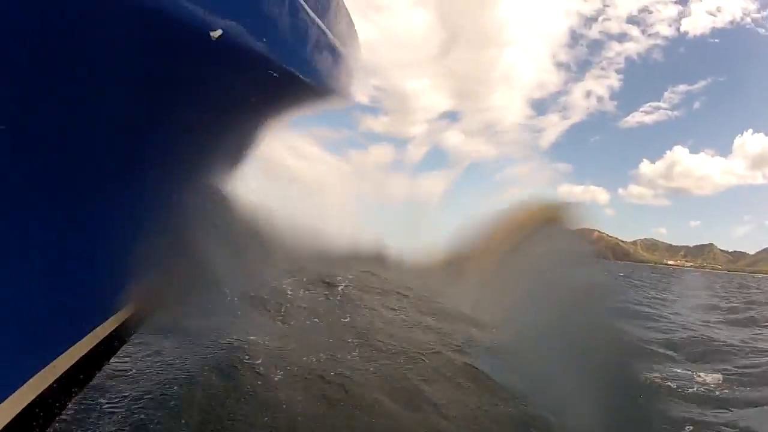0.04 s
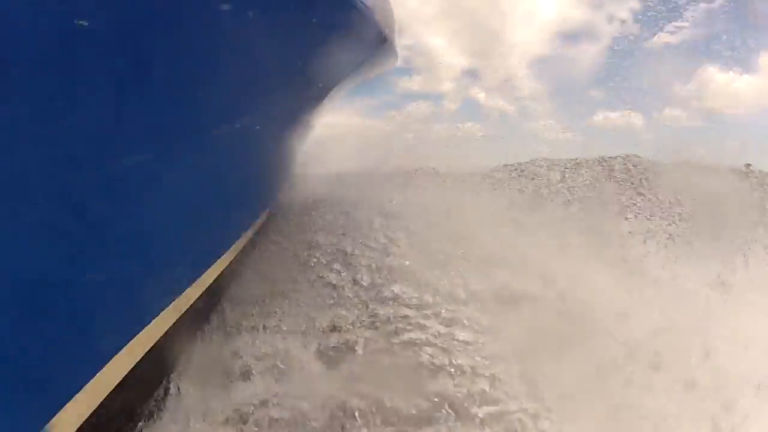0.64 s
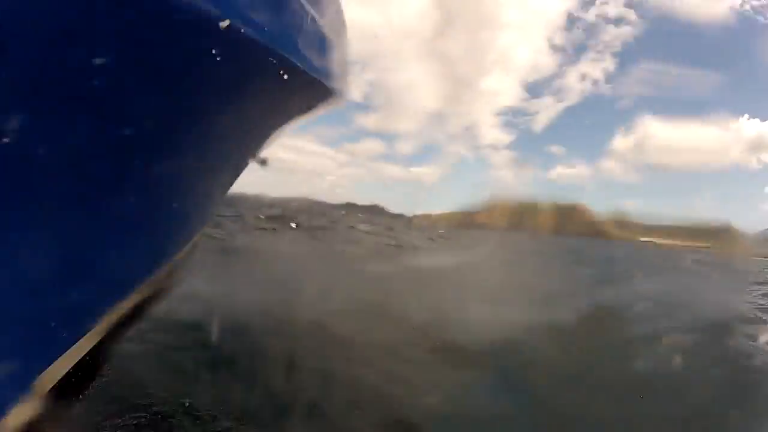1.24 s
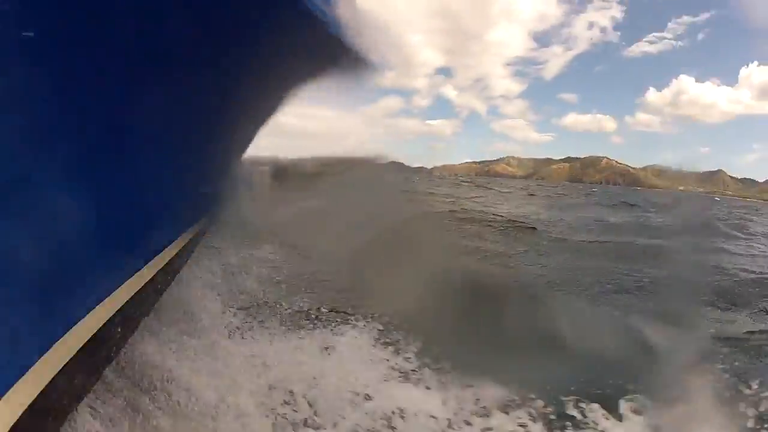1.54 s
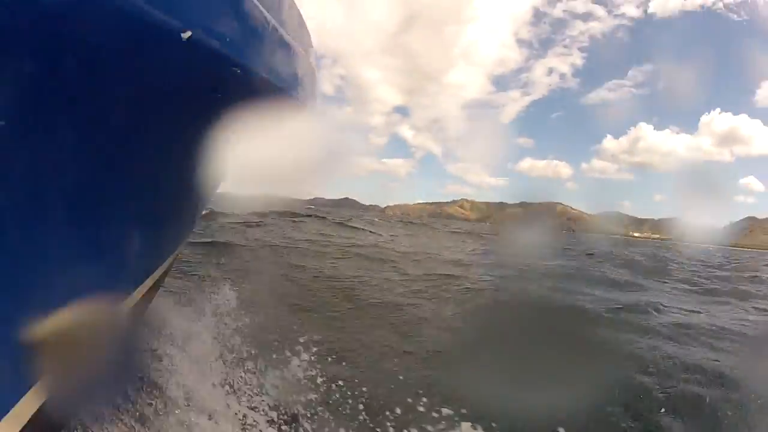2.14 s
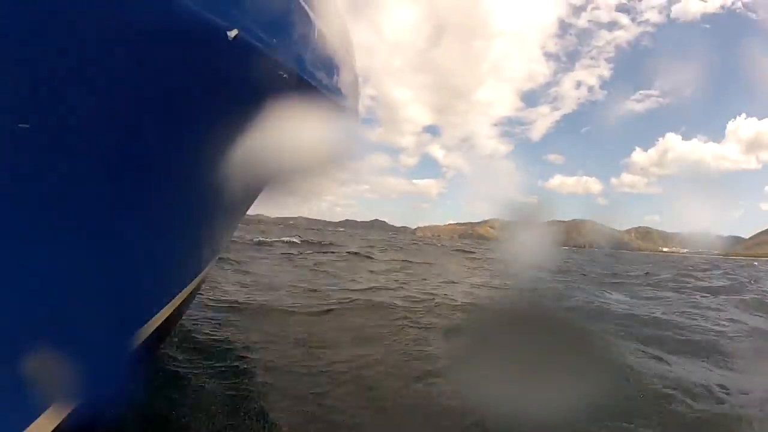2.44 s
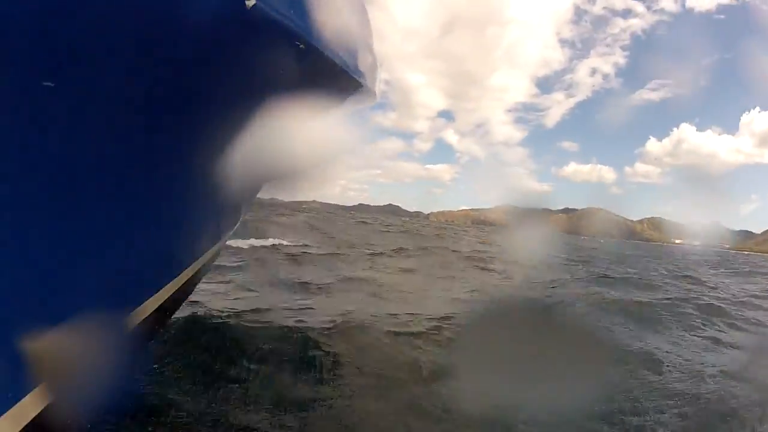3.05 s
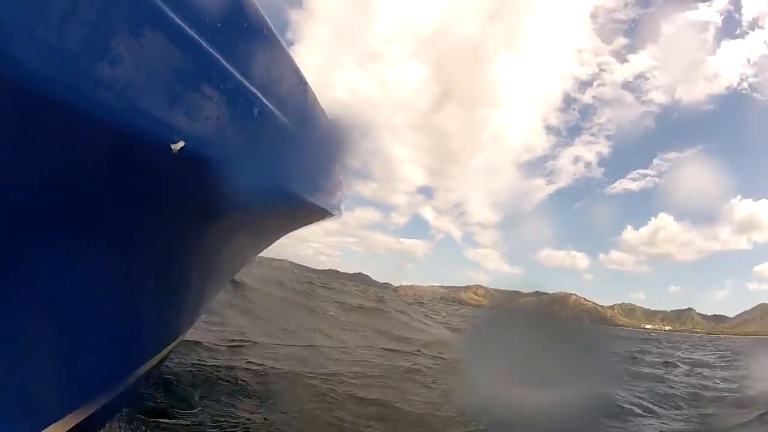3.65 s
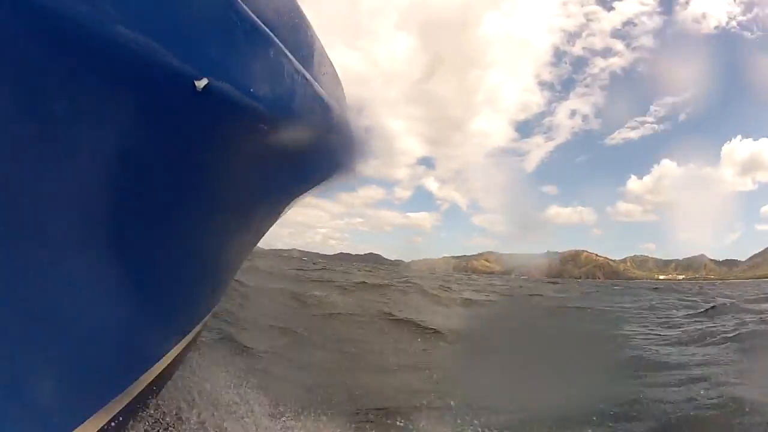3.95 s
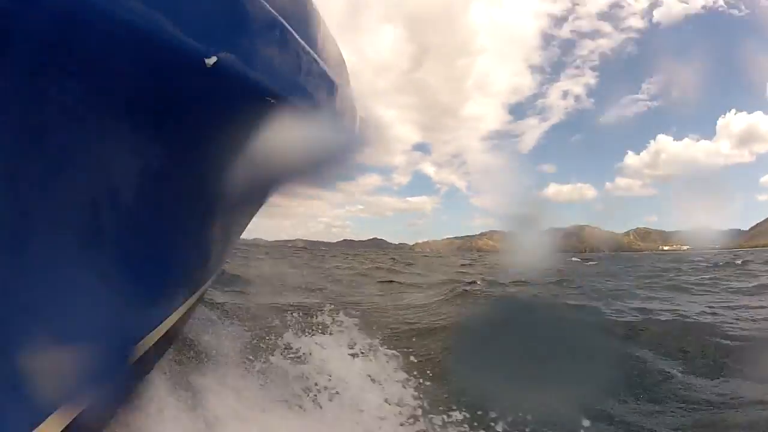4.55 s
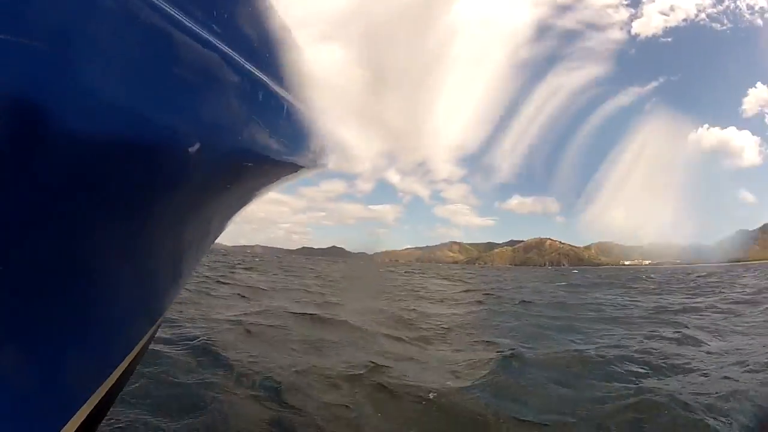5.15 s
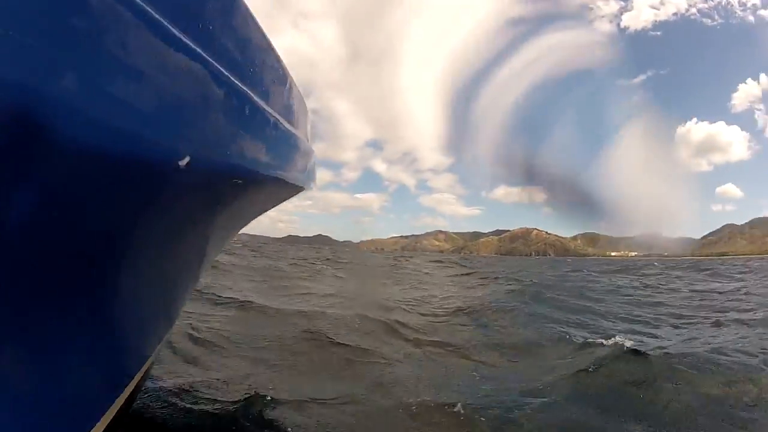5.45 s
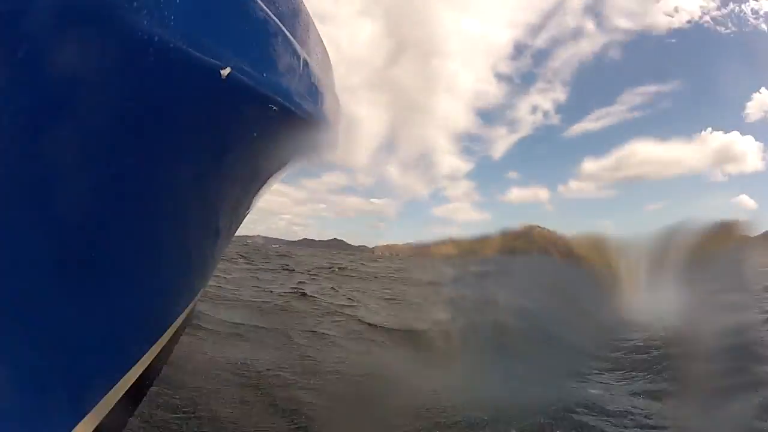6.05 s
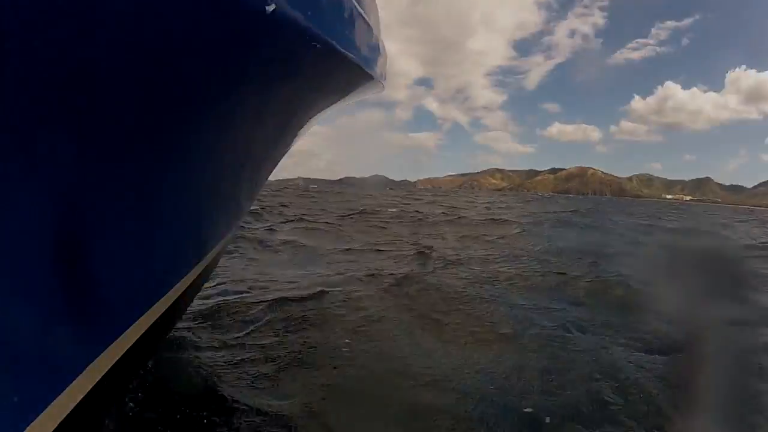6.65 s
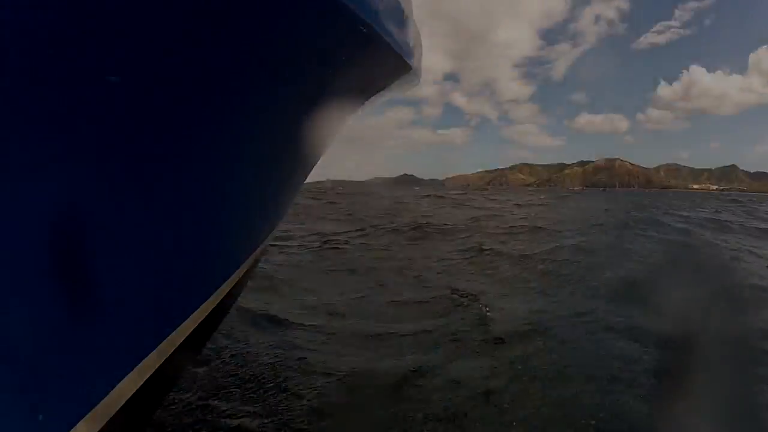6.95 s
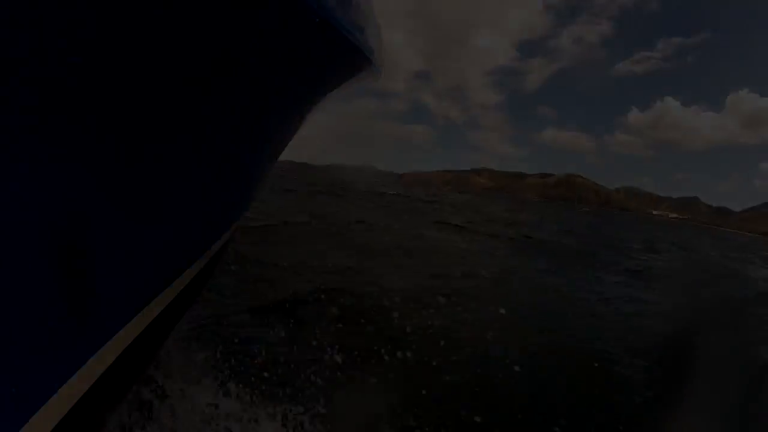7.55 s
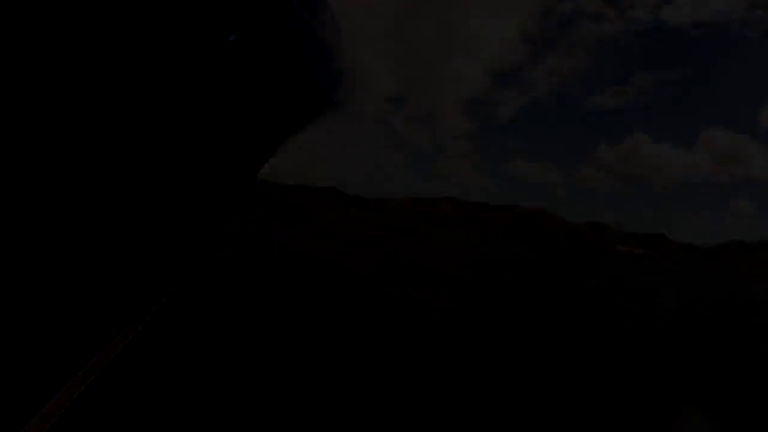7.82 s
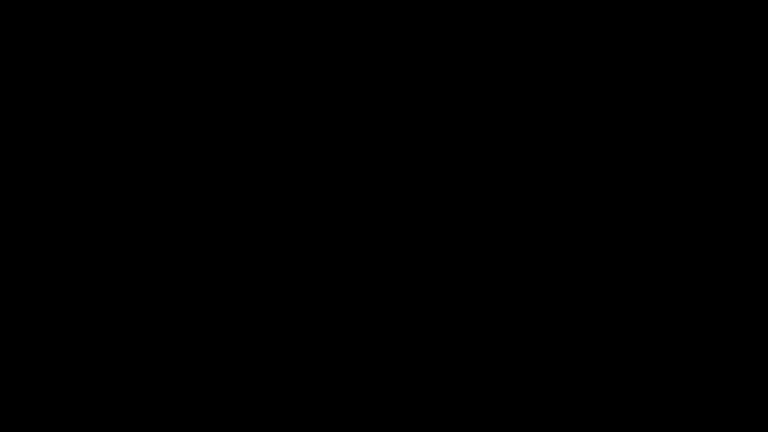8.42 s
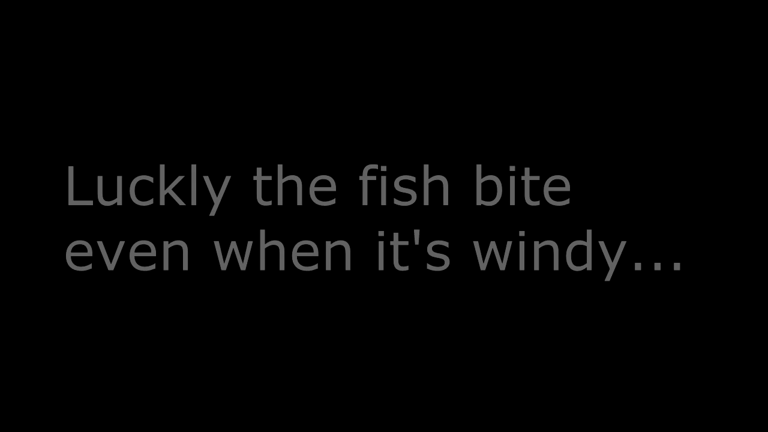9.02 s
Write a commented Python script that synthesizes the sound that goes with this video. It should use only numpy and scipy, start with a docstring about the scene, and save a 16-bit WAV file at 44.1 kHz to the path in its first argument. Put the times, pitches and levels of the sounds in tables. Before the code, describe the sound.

A boat cuts through choppy sea with surging water hiss, buffeting wind, hull thuds and spray rattling on the microphone.

```python
"""Hiss swelling with each wave, wind rumble and splashes: a motorboat in a choppy sea, heard by a camera
in a waterproof case held low beside the bow. The bow thuds into waves; air whistles past it once.
Three times water comes over: spray rattles on the case and lumps knock on it. Sheets of water
muffle sea and wind until they drain. The sound fades out at the end."""
import sys
import numpy as np
from scipy import signal
from scipy.fft import rfft, irfft
from scipy.io import wavfile
from scipy.ndimage import uniform_filter1d

SR = 44100
rng = np.random.default_rng(int(sys.argv[2]) if len(sys.argv) > 2 else 0)


def unload_wav(signal):
    """Save mono or channel-first audio to the path in sys.argv[1] as 16-bit WAV at rate SR, clipped to [-1, 1]."""
    wavfile.write(
        sys.argv[1],
        SR,
        np.round(np.clip(np.atleast_2d(signal).T, -1, 1) * 32767).astype(np.int16),
    )


N = 409241
TIME = np.arange(N) / SR
HOLD_HZ = 12000  # camera's sample-and-hold rate

# spectrum of water's dull push on the case: (frequency [Hz], relative gain [dB])
PUSH_SPECTRUM = [(30, -11), (170, -3), (350, -3), (550, -2.5), (780, -5), (1080, -5.5), (1400, -13),
                 (1700, -5.5), (2500, -23.5), (6000, -51.5)]


def undb(db):
    """Decibels to gain."""
    return 10 ** (np.asarray(db) / 20)


def unit(x):
    """Scale to rms 1."""
    return x / np.sqrt(np.mean(x ** 2))


def power_sum_db(a_db, b_db):
    """Level of two unrelated sounds together."""
    return 10 * np.log10(undb(a_db) ** 2 + undb(b_db) ** 2)


def curves(table):
    """Table columns, interpolated linearly in time."""
    times_s, *columns = np.transpose(table)
    return [np.interp(TIME, times_s, column) for column in columns]


def envelope(start_s, length_s, attack_s, release_s):
    """Linear attack, hold until length_s, exponential release."""
    age_s = TIME - start_s
    return np.clip(age_s / attack_s, 0, 1) * np.exp(-np.clip((age_s - length_s) / release_s, 0, 20))


def flutter(rate_hz):
    """Random steps, smoothed twice; rms 1."""
    hold = max(int(SR / rate_hz), 1)
    steps = np.repeat(rng.standard_normal(N // hold + 1), hold)
    return unit(uniform_filter1d(uniform_filter1d(steps, hold), hold)[:N])


def colour(x, spectrum, size=8192):
    """Causal unit-energy filter with the given spectrum, cut above HOLD_HZ / 2."""
    hz, db = np.transpose(spectrum)
    bins_hz = np.arange(size // 2 + 1) * SR / size
    gain = undb(np.interp(np.log(bins_hz + 1), np.log(hz), db))
    cepstrum = irfft(np.log(gain))
    cepstrum[1:size // 2] *= 2  # fold to minimum phase
    cepstrum[size // 2 + 1:] = 0
    lowpass = signal.butter(10, HOLD_HZ / 2, fs=SR, output="sos")
    response = signal.sosfilt(lowpass, irfft(np.exp(rfft(cepstrum))))
    return signal.fftconvolve(x, response / np.linalg.norm(response))[:N]


def drops(rate_hz, spread_db, max_spreads=3.35):
    """Random impacts, many small, a few large; rms 1."""
    lands = rng.random(N) < rate_hz / SR
    sizes = undb(spread_db * np.minimum(rng.exponential(size=N), max_spreads))
    return unit(lands * sizes * rng.choice([-1, 1], N))


def wind(wave_rumble_db, loss_db, puff_db=2.1):
    """Eddies buffet the case in quick, uneven puffs; waves add to the rumble."""
    # wind strength on the case: (time [s], level [dB])
    strength = [(0, -29.5), (.24, -23), (.45, -23.5), (.7, -28), (1.2, -30), (1.57, -25), (1.87, -30.5),
                (2.1, -28.5), (2.55, -31), (2.85, -30.5), (3.2, -34), (3.6, -29), (4.6, -29), (5.3, -31),
                (6.3, -31.5), (6.7, -34), (7.6, -33.5), (8.35, -30.5)]
    # rumble inside the case: (frequency [Hz], relative gain [dB])
    spectrum = [(12, -5.5), (25, -3), (45, -5.5), (75, -3), (140, 0.5), (210, -2), (300, -3.5), (400, -8.5),
                (620, -18.5), (1200, -22.5), (4000, -71)]
    level_db = power_sum_db(curves(strength)[0], wave_rumble_db) - loss_db
    rumble = colour(rng.standard_normal(N), spectrum)
    return unit(rumble * undb(puff_db * flutter(35))) * undb(level_db)


def whistle(pitch_wobble=0.0183, flicker_db=2.0):
    """Air past the bow: a thin tone that firms up, then rises as it dies."""
    # course of the whistle: (time [s], pitch [Hz], level [dB])
    course = [(3.24, 2150, -64), (3.31, 2120, -59), (3.4, 2173, -32), (3.455, 2090, -49),
              (3.485, 2064, -30), (3.52, 2080, -29), (3.55, 2130, -30), (3.585, 2190, -65)]
    hz, db = curves(course)
    sounding = (TIME > course[0][0]) & (TIME < course[-1][0])
    unsteady = np.clip((db.max() - db) / 8, .3, 1)  # weaker flow, shakier tone
    phase = 2 * np.pi * np.cumsum(hz * (1 + pitch_wobble * unsteady * flutter(220))) / SR
    return sounding * undb(db + flicker_db * unsteady * flutter(70)) * np.sqrt(2) * np.sin(phase)


def swell(wash_db=-33, fall_per_rise=1.13):
    """Bow wave level in dB: steady wash, a surge per wave, a sudden rush per slam."""
    # waves the bow cuts: (crest time [s], hiss level [dB], rise [s])
    waves = [(.24, -30.5, 0.057), (0.541, -25, 0.085), (1.25, -28, 0.059), (1.59, -22, 0.12),
             (2.05, -29, 0.13), (2.25, -27.5, 0.072), (2.35, -28.5, 0.039), (2.58, -27, 0.094),
             (2.75, -28, 0.049), (2.87, -28, 0.045), (2.98, -27, 0.055), (3.23, -31, 0.082),
             (3.41, -31.5, .045), (3.69, -29.5, 0.06), (3.92, -22.5, 0.082), (4.16, -28, 0.088),
             (4.45, -33.5, 0.066), (4.69, -25.5, .13), (4.96, -27.5, 0.054), (5.4, -39.5, 0.058),
             (5.99, -27, 0.086), (6.16, -31, 0.066), (6.59, -34, .11), (6.825, -23, 0.045),
             (7.06, -24.5, 0.066), (7.35, -31, 0.071), (7.55, -25, 0.09), (8.07, -34.5, 0.073),
             (8.32, -35, .08)]
    # water thrown as the bow slams: (start [s], length [s], hiss level [dB])
    slams = [(0.345, 0.095, -20), (5.529, 0.15, -20.5)]
    power = undb(wash_db) ** 2
    for crest_s, db, rise_s in waves:
        width_s = np.where(TIME < crest_s, rise_s, rise_s * fall_per_rise)
        power += undb(db) ** 2 * np.exp(-np.minimum(((TIME - crest_s) / width_s) ** 2, 100))
    for start_s, length_s, db in slams:
        power += (undb(db) * envelope(start_s, length_s, attack_s=.008, release_s=.044)) ** 2
    return 10 * np.log10(power)


def water_sheets(close_s=0.0071, drain_s=0.052):
    """Loss in dB under sheets of water, which close fast and drain slowly."""
    # sheets covering the case: (time closed [s], hold [s], depth [dB])
    sheets = [(1.09, 0.058, 12), (1.32, 0.013, 4), (4.798, 0.028, 21), (5.7, .1, 13)]
    return sum(depth_db * envelope(closed_s - close_s, close_s + hold_s, close_s, drain_s)
               for closed_s, hold_s, depth_db in sheets)


def bow_wave(level_db, band_flicker_db=0.5, flicker_db=0.96):
    """Foam and droplets fall back on the sea; the harder thrown, the brighter the hiss."""
    # hiss inside the case, which rings near 2 kHz: (frequency [Hz], relative gain [dB])
    spectrum = [(150, -29), (450, -13), (700, -17), (1020, -11), (1340, -20), (1780, -4), (2130, 1),
                (2680, -5), (2900, -10), (3220, -14), (3560, -8), (3930, -15.5), (4480, -11), (5100, -21),
                (6000, -22.5)]
    fizz = colour(rng.standard_normal(N) + undb(-3) * drops(rate_hz=2500, spread_db=6.0), spectrum)
    treble = signal.sosfiltfilt(signal.butter(3, 2400, "high", fs=SR, output="sos"), fizz)
    brightness_db = 0.1 * np.clip(level_db - np.median(level_db), -8, 8)
    hiss = (fizz - treble) * undb(band_flicker_db * flutter(25))
    hiss += treble * undb(brightness_db + band_flicker_db * flutter(16))
    return unit(hiss * undb(flicker_db * flutter(35))) * undb(level_db)


def hull_thuds(size=8192):
    """A wave shoves hull and case, which swing for a cycle or two."""
    # bow meeting a wave: (time [s], envelope peak [dB], pitch [Hz], decay [s])
    shoves = [(.354, -8.5, 208, 0.0035), (.405, -1, 169, 0.0039), (.459, -12, 36, .015),
              (.508, -16, 55, .012), (0.559, -9, 110, 0.0034), (1.565, -12, 137, .012),
              (4.75, -11.5, 155, 0.0081), (5.539, -12.5, 140, 0.01), (5.565, -18, 120, .015),
              (5.602, -7, 172, 0.0045), (5.733, -12, 230, .004), (5.74, -7, 120, 0.005),
              (5.85, -21.5, 169, 0.0069), (6.784, -17.5, 285, 0.0064), (8.04, -15, 190, 0.0046),
              (8.06, -19, 50, .016)]
    out, age_s = np.zeros(N), np.arange(size) / SR
    for start_s, db, hz, decay_s in shoves:
        i = int(start_s * SR)
        rise = 2 * age_s / decay_s
        out[i:i + size] += undb(db) * rise * np.exp(1 - rise) * np.sin(2 * np.pi * hz * age_s)
    return out


def case_ring(blows):
    """The walls store each blow at their resonances and release it over a few milliseconds."""
    # wall resonances: (frequency [Hz], bandwidth [Hz])
    modes = [(2050, 600), (2450, 430), (3650, 320)]
    # a drop's impact inside the case: (frequency [Hz], relative gain [dB])
    spectrum = [(80, -13.5), (400, -16), (720, -9), (1050, -6), (1330, -10.5), (1750, 0.5), (2100, 3),
                (2550, -1), (2900, -6.5), (3300, -6.5), (3650, -3), (4200, -8.5), (5050, -12), (5900, -14)]
    for hz, width_hz in modes:
        poles = signal.iirpeak(hz, hz / width_hz, fs=SR)[1]
        blows = signal.lfilter(poles[::-1], poles, blows)  # all-pass: smears in time only
    return colour(blows, spectrum)


def spray(stray_db, flicker_db=1.4):
    """Showers and stray drops ring the case; heavy drops also give a dull push."""
    # showers on the case: (start [s], length [s], level [dB], push re level [dB]); mist pushes least
    showers = [(.345, 0.21, -30, -8), (.59, 0.18, -18.5, -10), (.77, .2, -19, -20), (.97, 0.079, -18.5, -3),
               (1.045, 0.048, -30.5, -8), (1.1, 0.17, -29.5, -9), (1.22, .075, -21, -9),
               (1.3, 0.034, -29.5, -3), (1.62, .19, -23.5, -7), (4.715, 0.067, -24.5, 0),
               (5.665, .035, -23, -2), (5.71, 0.072, -35.5, 5), (5.85, .16, -28, -9)]
    ring_power, push_power = undb(stray_db) ** 2, 0
    for start_s, length_s, db, weight_db in showers:
        power = (undb(db) * envelope(start_s, length_s, attack_s=.012, release_s=.008)) ** 2
        ring_power += power
        push_power += power * undb(weight_db) ** 2
    impacts = unit(drops(rate_hz=1250, spread_db=4.0) * undb(flicker_db * flutter(150)))
    return case_ring(impacts * np.sqrt(ring_power)) + colour(impacts * np.sqrt(push_power), PUSH_SPECTRUM)


def slaps(splatter_s=0.00076, splatter_in_push=0.071, ring_gain_db=23, push_gain_db=18.5, size=768):
    """A lump of water pushes the case once and breaks up in milliseconds of splatter."""
    # lumps hitting the case: (time [s], relative ring level [dB], relative push level [dB])
    lumps = [(0.351, -17, -28.5), (0.617, -17, -19), (.637, -18, -21), (.664, -17, -28), (.685, -18, -22),
             (.709, -14.5, -20), (.755, -16, -26), (.803, -17, -36), (.841, -13, -30.5),
             (0.852, -13.5, -27), (.888, -12.5, -18), (0.929, -10, -26.5), (.984, -14, -29),
             (1.017, -17, -14), (1.022, -16.5, -4), (1.031, -14.5, -12), (1.038, -18, -11.5),
             (1.068, -22.5, -7.5), (1.08, -20, -5), (1.101, -16, -27), (1.141, -34, -18.5),
             (1.195, -18.5, -18.5), (1.252, -19, -16.5), (1.268, -10.5, -10.5), (1.293, -8, -23),
             (1.321, -17, -14), (1.326, -21.5, -13.5), (1.333, -36.5, -11), (1.35, -21.5, -12),
             (1.563, -16, -26), (1.789, -13.5, -30), (1.807, -27, -18), (1.833, -35, -16),
             (1.851, -23.5, -22.5), (4.681, -19.5, -26.5), (4.727, -20.5, -4), (4.739, -7, -18.5),
             (4.75, -12.5, 1), (4.764, -17, -0.5), (4.768, -17, -7.5), (4.787, -26, -16), (5.535, -12, -34),
             (5.57, -17, -31.5), (5.599, -16.5, -19.5), (5.611, -9, -27), (5.671, -8.5, -16),
             (5.678, -11.5, -12.5), (5.687, -13, -9), (5.692, -10, -15), (5.734, -29.5, -12.5),
             (5.743, -19, -13.5), (5.752, -21.5, -18), (5.781, -36, -26), (5.849, -27, -25),
             (5.939, -14.5, -29), (6.107, -27, -42), (7.595, -25, -38)]
    sharp, dull = np.zeros(N), np.zeros(N)
    rise = np.arange(size) / SR / splatter_s
    for start_s, ring_db, push_db in lumps:
        i = int(start_s * SR)
        splatter = rng.standard_normal(size) * rise * np.exp(1 - rise)
        push = splatter_in_push * splatter - signal.unit_impulse(size)
        sharp[i:i + size] += undb(ring_db + ring_gain_db) * splatter / np.linalg.norm(splatter)
        dull[i:i + size] += undb(push_db + push_gain_db) * push / np.linalg.norm(push)
    return case_ring(sharp) + colour(dull, PUSH_SPECTRUM)


def scene(fade_end_s=8.493, fade_s=1.75):
    """Mono mix of sea, wind and water on the case, fading out."""
    swell_db, loss_db = swell(), water_sheets()
    hiss_db = swell_db - loss_db
    sea_and_wind = bow_wave(hiss_db) + wind(wave_rumble_db=swell_db - 12, loss_db=loss_db)
    splashes = spray(stray_db=hiss_db - 12) + slaps()
    fade = np.clip((fade_end_s - TIME) / fade_s, 0, 1) ** 0.69
    return (fade * (sea_and_wind + splashes + hull_thuds() + whistle()))[None]


def record(dry, ceiling=.88, top_hz=15300):
    """The camera flattens peaks and holds samples at a low rate, mirroring sound into gritty treble."""
    slow = signal.resample_poly(dry, HOLD_HZ, SR, axis=1, window=("kaiser", 4))
    steps = np.repeat(np.clip(slow, -ceiling, ceiling), 4, axis=1)
    held = signal.resample_poly(steps, SR, 4 * HOLD_HZ, axis=1)[:, :N]
    return signal.sosfiltfilt(signal.ellip(10, .1, 60, top_hz, fs=SR, output="sos"), held)


dry = scene()
out = record(dry)
unload_wav(out)
```